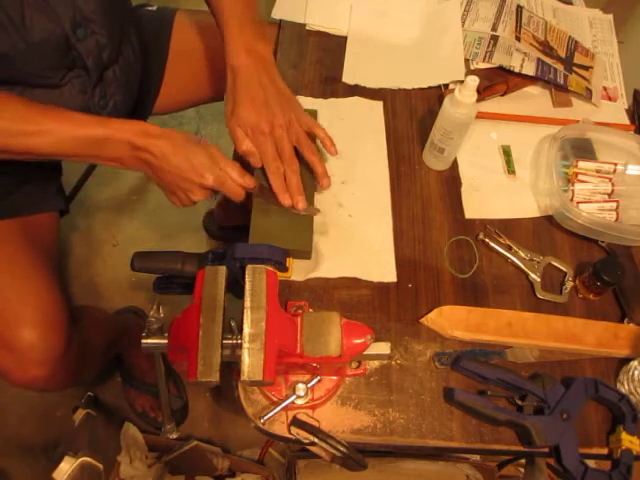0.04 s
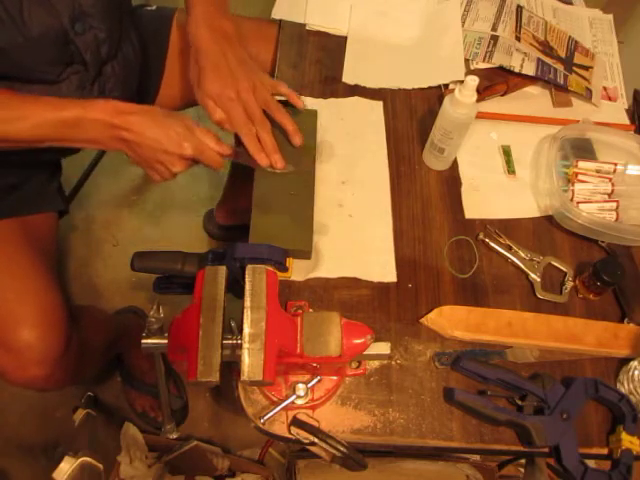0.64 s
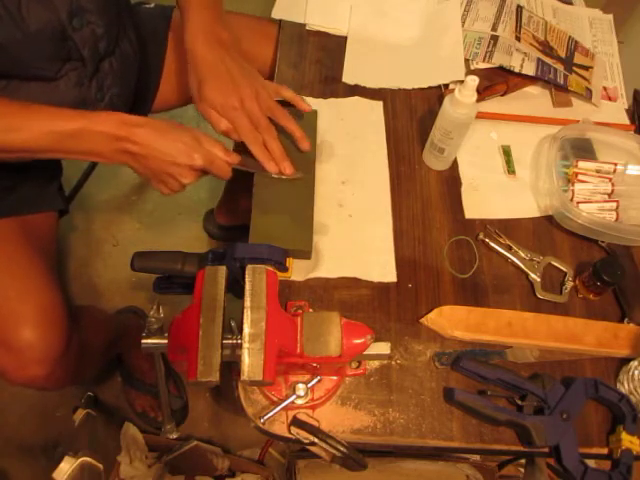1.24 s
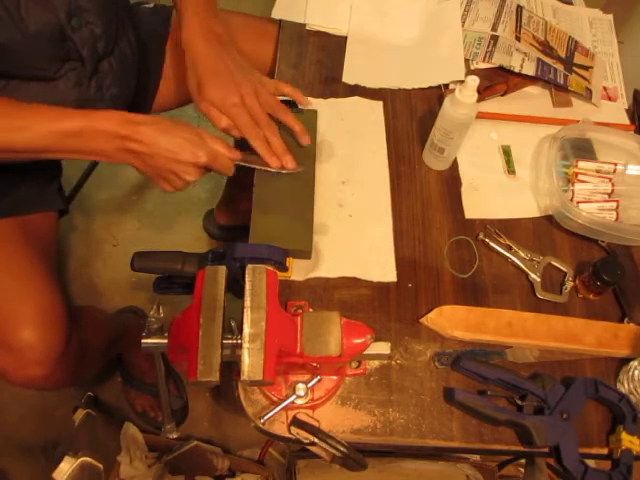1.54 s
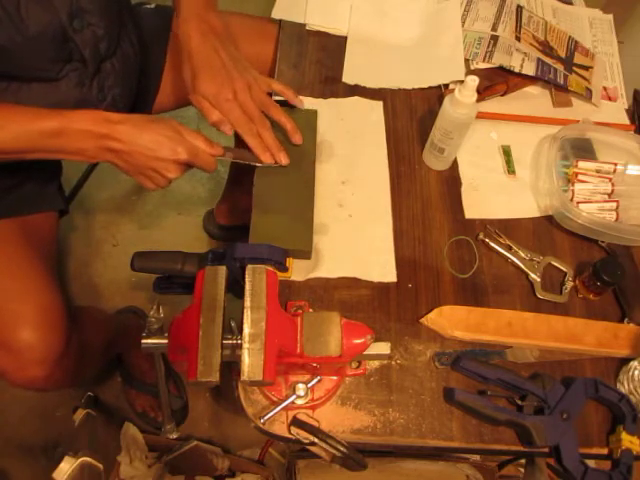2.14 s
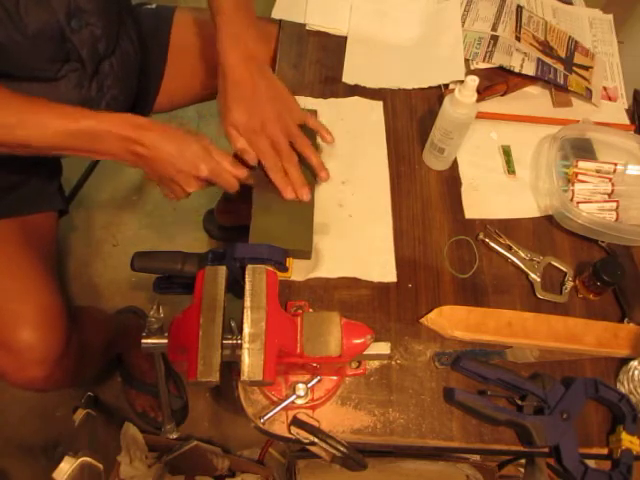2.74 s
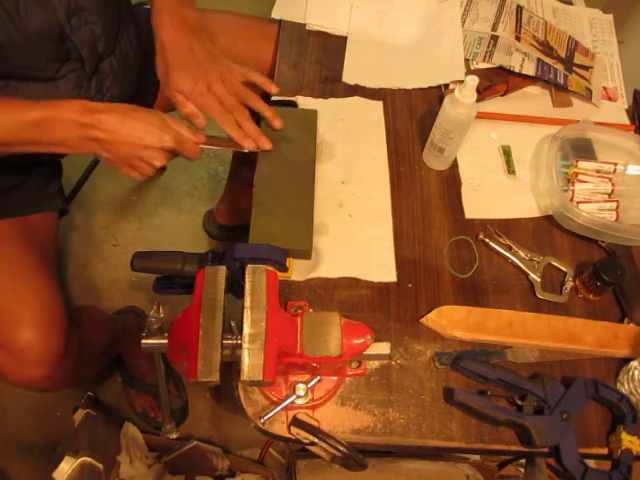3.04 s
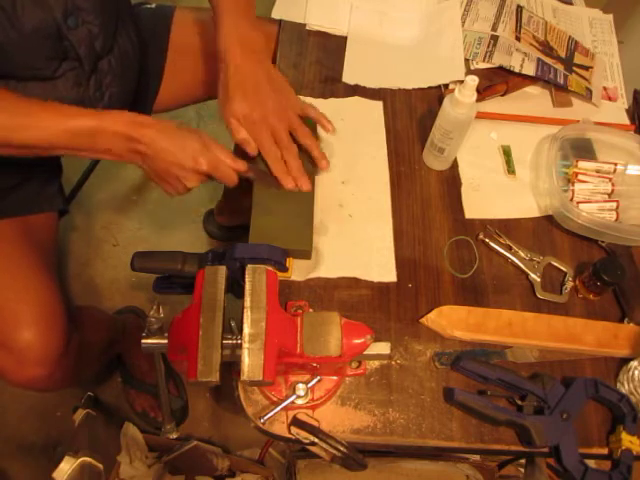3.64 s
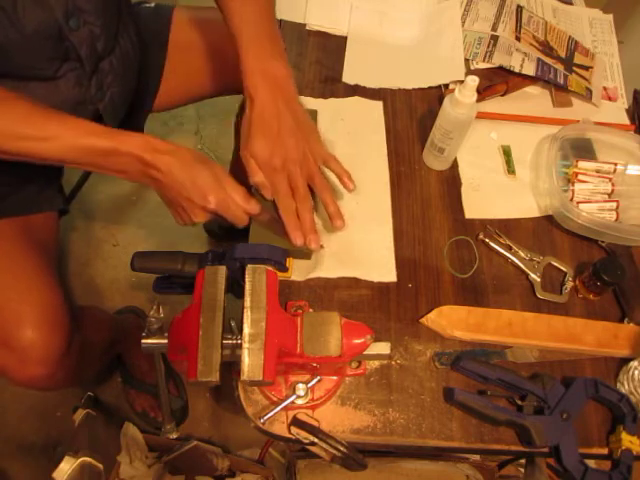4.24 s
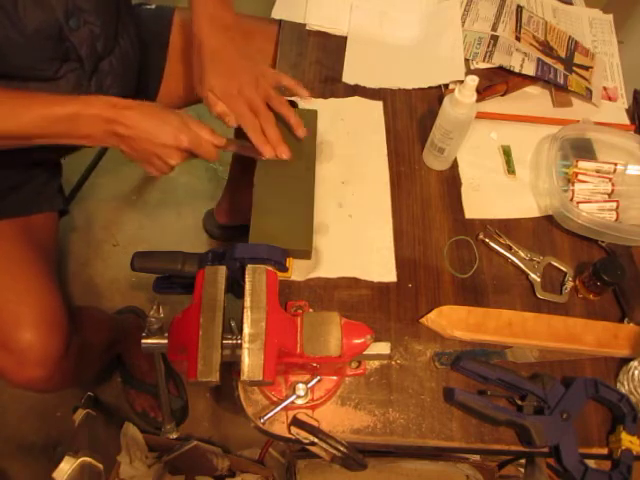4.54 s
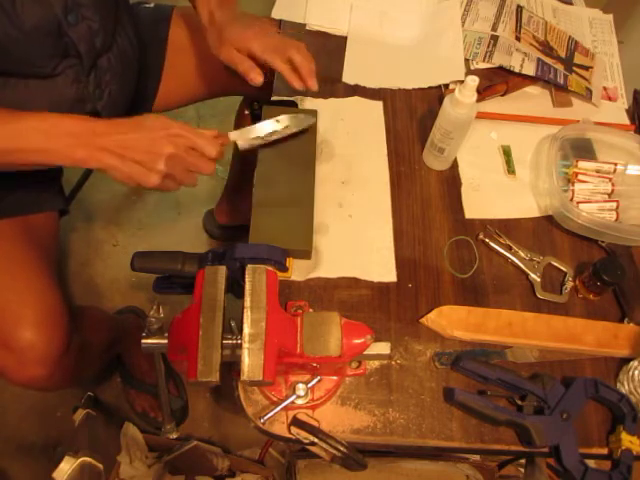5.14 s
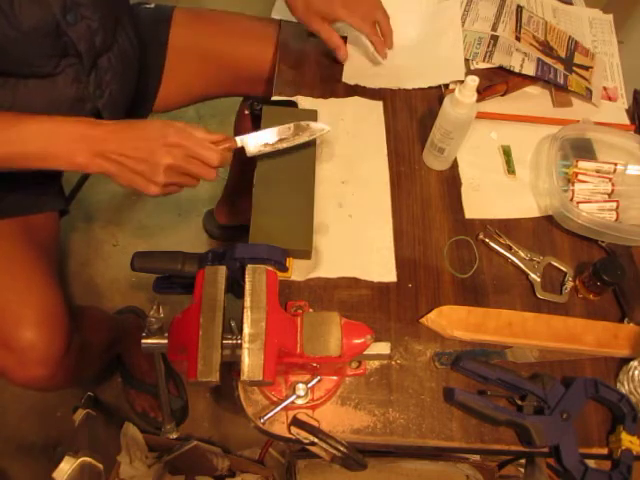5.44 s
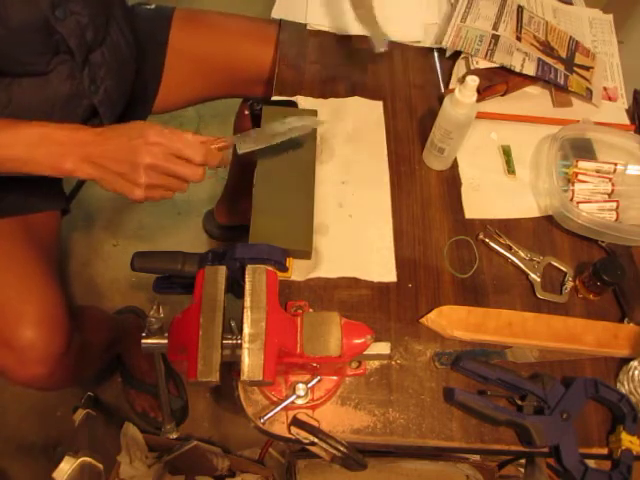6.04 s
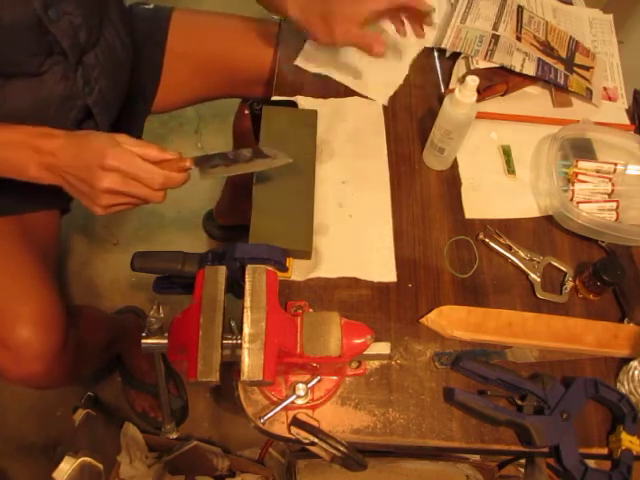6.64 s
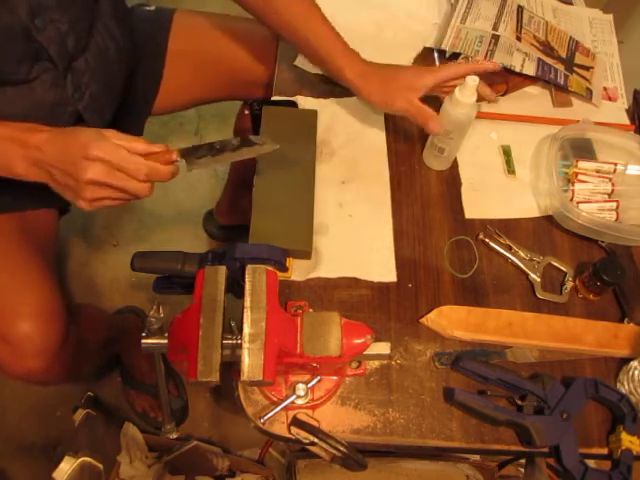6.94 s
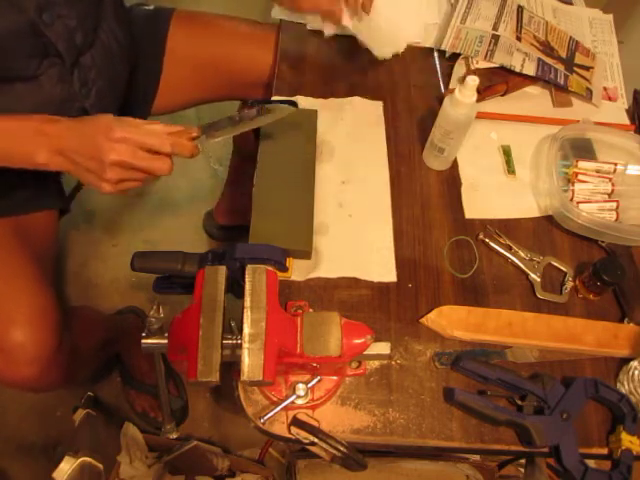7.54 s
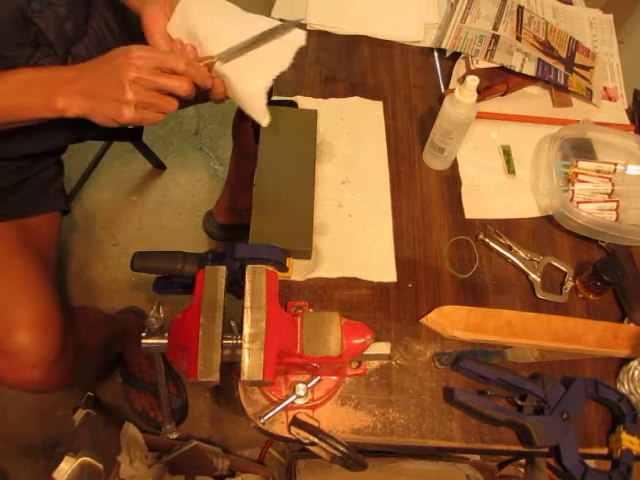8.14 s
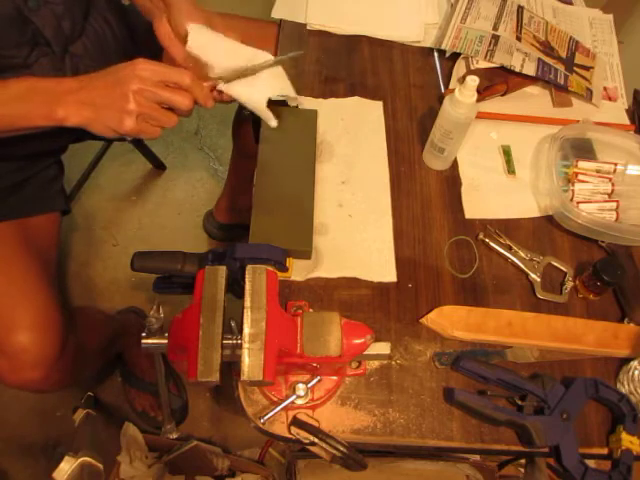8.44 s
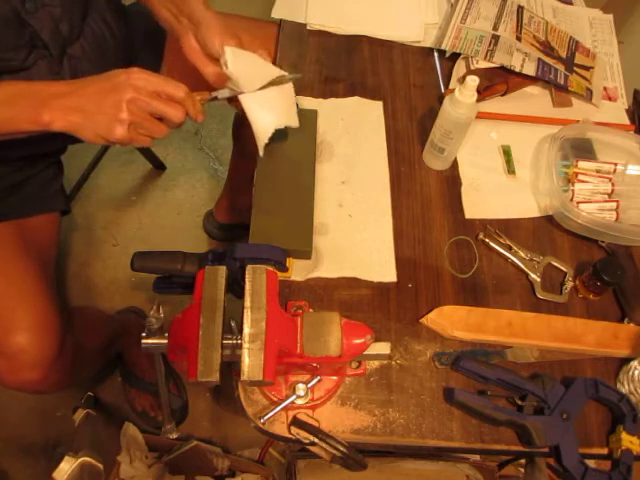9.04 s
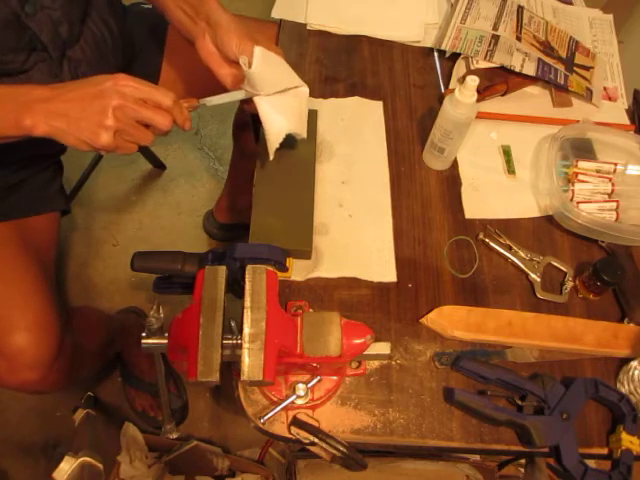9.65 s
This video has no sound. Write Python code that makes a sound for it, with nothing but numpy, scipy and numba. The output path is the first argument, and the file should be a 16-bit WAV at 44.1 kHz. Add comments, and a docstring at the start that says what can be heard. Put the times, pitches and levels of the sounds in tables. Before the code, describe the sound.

A knife blade scrapes back and forth on a sharpening block, then a cloth rustles and wipes it, with light workbench bumps.

```python
"""A knife is honed on an abrasive block clamped to a workbench: full strokes, quick short ones toward
the tip, then three long pairs. Grit plucks the steel edge and rings the blade, whose colour glides
as the contact travels along it. From about 5 s a hand picks up a cloth, bumps the bench and wipes
the blade in soft, rustling swells. Under it all a fan whirs in the small workshop."""
import sys
import numpy as np
from scipy import signal
from scipy.fft import rfft, irfft, next_fast_len
from scipy.io import wavfile
from scipy.ndimage import uniform_filter1d, map_coordinates
from numba import njit

SR = 44100
rng = np.random.default_rng(int(sys.argv[2]) if len(sys.argv) > 2 else 0)


def generate_wav(sig):
    """Save sig (samples, or channels by samples) to the path in sys.argv[1] as 16-bit PCM at SR."""
    pcm = np.round(np.clip(np.atleast_2d(sig).T, -1, 1) * 32767).astype(np.int16)
    wavfile.write(sys.argv[1], SR, pcm)


N = 436149
T = np.arange(N) / SR
FREQ = np.maximum(np.arange(N // 2 + 1) * SR / N, 1)
LEFT_RIGHT = np.array([[1], [-1]])

# Strokes on the block; the contact runs from 0 at the heel to 1 at the tip:
# (start [s], end [s], fastest at [share of stroke], swell [exponent], contact from [0-1],
#  contact to [0-1], hiss level [dB], and relative to the hiss: flat ring [dB], top [dB], grind [dB])
HONING_STROKES = [ (-.07, .255, 0.39, 0.74, 0.49, 0.51, -34.5, 1.5, -6, -20),
                  (0.256, 0.485, 0.55, 0.85, 0.092, 0.00025, -30.5, -8.5, -1.5, -22.5),
                  (0.474, 0.716, 0.44, 0.84, 0.31, 0.69, -32.5, -1, -4, -22),
                  (0.717, 0.89, 0.35, 1.07, .8, 0.75, -29.5, -8, -6, -27.5),
                  (0.882, 1.085, 0.32, 1.17, 0.67, 0.72, -32, -8, -5, -28),
                  (1.078, 1.232, 0.72, 0.55, 0.61, 0.55, -40, -12, -11, -24),
                  (1.233, 1.403, 0.52, 0.87, .8, 0.87, -32.5, -6, -5, -26.5),
                  (1.401, 1.56, 0.41, .8, 0.49, .55, -40.5, -16, -9, -26),
                  (1.55, 1.731, 0.45, 0.93, 0.51, 0.55, -41.5, -13.5, -8, -25),
                  (1.727, 1.926, 0.28, 1.2, 0.88, 0.9, -44, -4, -8, -19),
                  (2.12, 2.616, .62, 0.94, 0.82, 0.21, -30, -0.5, -5, -27.5),
                  (2.615, 3.068, .3, 0.9, 0.14, 0.97, -35, 0.5, -8, -28),
                  (3.072, 3.526, 0.65, 1.44, 0.91, 0.0056, -30.5, -2.5, -0.5, -26.5),
                  (3.521, 3.9, 0.26, 0.8, 0.13, 0.87, -34.5, 1, -2.5, -30),
                  (3.902, 4.311, 0.63, 1.57, 0.86, 0.25, -28, -4.5, 1.5, -27.5),
                  (4.306, 4.709, 0.27, 1.22, 0.094, 0.76, -33, -4.5, -3, -29.5), ]
# The edge bites deeper: (time [s], half length [s], extra hiss [dB], flat ring [dB], grind [dB])
EDGE_BITES = [(0.177, .025, 4, -4, -1.5), (0.32, 0.023, 5, -9, -5), (1.16, 0.012, 4, -4, -2),
              (2.37, 0.032, -0.5, -1.5, 8.5), (2.558, 0.016, 2.5, 2, -4), (2.719, .015, -0.5, 5, -8),
              (3.342, 0.035, 4, 0, -5), (3.738, .03, 3, -9, 4), (4.17, 0.016, 4, 1, -4),
              (4.42, 0.029, 2.5, 5.5, -3)]
# Broad colour of the scraping edge: (frequency [Hz], gain [dB])
EDGE_COLOUR = [(1500, -36.5), (2150, -11.5), (2900, -37), (4200, -12), (5000, -34.5), (6150, -10.5),
               (7000, -14.5), (8700, -9), (9900, -12.5), (10700, -5.5), (12000, -2), (13400, 1.5),
               (15800, 0)]
# Colour of the edge's stereo width: (frequency [Hz], gain [dB])
EDGE_SIDE_COLOUR = [(3000, -47), (5000, -39), (8500, -8.5), (12000, -6.5), (15800, -9.0)]
# Narrow rings of the edge: (frequency [Hz], width [Hz], gain [dB])
EDGE_RINGS = [(6560, 200, -16.5), (7700, 290, -8.5), (9590, 180, -5), (10490, 700, -4.5), (11950, 460, 1.5),
              (14900, 750, 1.5)]
# Rings of the flat of the blade: (frequency [Hz], width [Hz], gain [dB])
FLAT_RINGS = [(3690, 400, -13), (4700, 320, -4.5), (5067, 160, 1.5), (5500, 290, 2.5), (6950, 430, -2.5)]
# Grind beneath the hiss: (frequency [Hz], width [Hz], gain [dB])
GRIND_BANDS = [(2710, 460, 0.11), (3196, 330, 0.43)]
# Upper bending modes, damped to a rasp by the fingers: (ratio to first mode, gain [dB], Q)
BEND_OVERTONES = [(2.756, -1.5, 9.9), (3.4, -4.5, 9.0)]
# Short bright ticks on the blade: grains caught during strokes, and one faint finger touch in the pause:
# (time [s], peak level [dB])
BLADE_TICKS = [(.2745, -34), (.809, -30), (.922, -32), (1.153, -31), (1.7705, -29), (2.005, -44),
               (2.1462, -26.5), (2.724, -18), (3.748, -29), (4.187, -19)]
# Pull strokes make the block hum: (centre time [s], length [s], level [dB])
PULL_STROKES = [(0.11, 0.32, -53), (0.62, 0.29, -54), (1.01, 0.3, -60), (1.344, 0.12, -62),
                (2.83, 0.37, -61), (3.708, 0.57, -59.5), (4.496, 0.44, -59)]
# Short strokes rock the block on the bench: (time [s], level [dB])
ROCKING_LEVELS = [(0, -72), (.8, -70), (1.2, -66), (1.55, -58), (1.9, -66), (2.1, -77)]
# Rumble of the rocking block: (frequency [Hz], width [Hz], gain [dB])
ROCKING_BANDS = [(147, 52, -4.0), (520, 54, -7.5)]
# The cloth is pulled, shaken out and wiped along the blade:
# (peak time [s], rise [s], fall [s], fibre hiss [dB], fold rustle [dB])
CLOTH_WIPES = [ (5.055, .023, 0.05, -73, -81), (5.62, .027, 0.04, -55, -61), (5.7, 0.13, 0.14, -66.5, -62),
               (6.025, 0.083, .017, -63.5, -69), (6.11, .07, .03, -72, -76),
               (6.317, 0.087, 0.037, -57.5, -55), (6.428, .012, 0.028, -53, -55),
               (6.46, .02, 0.021, -64, -52), (6.505, .06, 0.032, -61.5, -56), (6.9, 0.14, .055, -77, -62.5),
               (7.469, .07, 0.032, -62.5, -62), (7.642, .018, .035, -56, -57),
               (7.78, 0.091, 0.11, -55, -56), (8.088, 0.081, .045, -62.5, -56.5),
               (8.3, .19, .02, -61.5, -59), (8.412, 0.073, 0.089, -59, -54), (8.55, .06, 0.079, -64, -56.5),
               (8.83, 0.25, .22, -72.5, -71), (9.016, .01, 0.036, -64.5, -57.5), ]
# Airy hiss of the fibres: (frequency [Hz], gain [dB])
FIBRE_EQ = [(1500, -8), (2700, 3.5), (3600, -8.5), (5000, -5.5), (8000, -2.5), (11000, 4.5), (13000, 1),
            (15800, -1)]
# Darker rustle of the folds: (frequency [Hz], gain [dB])
FOLD_EQ = [(60, -10), (150, 0), (280, -1), (500, 8.5), (900, 10), (1500, -0.5), (2100, -1.5), (2650, 3),
           (3300, -5.5), (6000, -12.5), (15800, -35)]
# The cloth snaps in a fold: (time [s], relative peak level [dB])
FOLD_SNAPS = [(5.337, -37.5), (5.6109, -47), (5.6907, -36), (5.792, -47), (6.023, -44), (6.2405, -41),
              (6.4205, -42), (6.5093, -50), (7.6358, -48), (8.2539, -49), (9.0087, -47)]
# Hand or blade bumps the bench: (time [s], peak level [dB], contact time [s])
BENCH_BUMPS = [(1.385, -44, .003), (1.513, -39, 0.00049), (1.573, -41, 0.0026), (1.776, -36, 0.00035),
               (5.545, -42, 0.0023), (5.569, -31, 0.0015), (5.584, -41, 0.0044), (5.63, -39, 0.0026),
               (7.4, -37, 0.0027), (7.412, -42, 0.0028), (7.447, -42, 0.0043), (7.622, -38, 0.0003),
               (7.63, -35, 0.0011), (7.675, -39, 0.0011), (8.435, -38, .0008)]
# Modes of the wooden top: (frequency [Hz], t60 [s], gain [dB])
BENCH_RINGS = [(62, 0.15, -28), (155, 0.039, -13), (210, 0.043, 2), (298, 0.032, 8), (474, 0.022, 9.5),
               (733, 0.12, 2), (1048, 0.066, 8.5), (1480, 0.041, 3)]
# Resonances of the fan's housing: (frequency [Hz], width [Hz], gain [dB])
FAN_HOUSING = [(1248, 89, 3), (1433, 27.6, 1), (1563, 107, 1), (1706, 210, -23)]
# Room tone that both ears share: (frequency [Hz], noise density [dB re 1/Hz])
ROOM_TONE_MID = [(25, -79.5), (150, -80.5), (260, -82.5), (420, -86.5), (800, -91), (1600, -89.5),
                 (2100, -102), (3000, -110), (4200, -115), (7500, -116), (11500, -114), (15800, -116)]
# Room tone in opposite phase between the ears: (frequency [Hz], noise density [dB re 1/Hz])
ROOM_TONE_SIDE = [(25, -62), (60, -69.5), (150, -66), (260, -71.5), (420, -75.5), (700, -82), (1100, -86.5),
                  (1650, -90), (2100, -101), (3000, -111), (4200, -118), (7500, -120), (11500, -116),
                  (15800, -117)]

HEEL_HZ, TIP_HZ, BEND_LAW = 5436, 2897, 1.85  # the first bending mode falls toward the tip
TIP_LOSS_DB, TIP_LAW = -13.5, 4.9  # the hiss fades as the tip alone touches
FLAT_FADE_DB = -16.5  # change in the ring of the flat from heel to tip
HELD_DB, FREE_DB, FREE_AT, FREE_WIDTH = -14, 8.5, 0.71, .15  # bending rings best near the belly
TOP_SLOPE, GRIND_SLOPE = .25, -0.43  # dB per dB of stroke motion, relative to the hiss
COMB_ECHO, COMB_CYCLES = 0.21, 2.11  # inverted echo from the fingers; lag in bending cycles
STICTION = 0.17  # share of full speed below which the blade clings to the block
TURN_DB = -23.5  # the edge keeps scraping a little as the stroke turns round


def honing():
    """Grit rings the edge and flat of the blade while the bending modes glide; returns mid and side."""
    place, motion_db, (hiss_db, flat_db, top_db, grind_db) = stroke_motion()
    hiss_bite, flat_bite, grind_bite = bites()
    hiss_db = hiss_db + motion_db + hiss_bite + TIP_LOSS_DB * place ** TIP_LAW
    flat_db = flat_db + flat_bite + FLAT_FADE_DB * place
    top_db = top_db + TOP_SLOPE * motion_db
    grind_db = grind_db + grind_bite + GRIND_SLOPE * motion_db
    freedom = undb(HELD_DB + FREE_DB * np.exp(-((place - FREE_AT) / FREE_WIDTH) ** 2))
    bend_hz = (HEEL_HZ + (TIP_HZ - HEEL_HZ) * place ** BEND_LAW) * (1 + .012 * wander(25))
    hiss, side = edge_hiss(bend_hz, top_db)
    plucks = grit(bend_hz)
    flat = unit(eq(plucks, peaks(FLAT_RINGS))) + undb(4.5) * freedom * bending_ring(bend_hz, q=12.0)
    grind = unit(eq(plucks, peaks(GRIND_BANDS)))
    rasp = sum(undb(db) * bending_ring(np.minimum(ratio * bend_hz, SR * 4 / 9), q)
               for ratio, db, q in BEND_OVERTONES)
    mid = undb(1.6) * hiss + undb(flat_db - 2.8) * flat + undb(grind_db) * grind + freedom * rasp
    mid = eq(mid, 1 - peaks([(2060, 360, -5)]))  # the blade radiates poorly below its lowest rings
    roughness = undb(0.64 * wander(450) + 0.83 * wander(60))
    return np.array([mid, side]) * undb(hiss_db) * roughness


def stroke_motion():
    """The hand speeds up and slows to each turn; returns contact place, motion in dB and four levels."""
    place, motion, levels = np.zeros(N), np.full(N, undb(-90)), np.zeros((4, N))
    for start, end, fastest, swell, here, there, *stroke_db in HONING_STROKES:
        now = (T >= start) & (T < end)
        peak_s = start + fastest * (end - start)
        speed = np.sin(np.pi * np.interp(T[now], [start, peak_s, end], [0, .5, 1]))
        speed = speed ** 2 * (1 + STICTION) / (speed + STICTION)
        place[T >= start] = there
        place[now] = here + (there - here) * np.cumsum(speed) / speed.sum()
        motion[now] = speed ** swell + undb(TURN_DB)
        levels[:, T >= start] = np.array(stroke_db)[:, None]
    place = np.clip(smooth(place, SR // 25), 0, 1)
    return place, smooth(20 * np.log10(motion), SR // 55), smooth(levels, SR // 30)


def bites():
    """Accents of hiss, ring and grind, in dB, as the edge digs in for a moment."""
    return sum(np.array(extra_db)[:, None] * np.exp(-((T - s) / half_length) ** 2)
               for s, half_length, *extra_db in EDGE_BITES)


def grit(bend_hz):
    """Dense grains pluck the steel; waves return from the blade's ends as a gliding metallic ripple."""
    plucks = grains(rate=30000, spread_db=0.6)
    plucks = plucks + .25 * tail(plucks, t60=.08)
    lag_cycles = np.geomspace(5, 48, 6) * rng.uniform(.85, 1.15, 6)
    echoes = sum(np.interp(T - cycles / bend_hz, T, plucks) for cycles in lag_cycles)
    return unit(plucks + .27 * echoes)


def edge_hiss(bend_hz, top_db):
    """The plucked edge sizzles, hollowed by a moving notch and comb; returns mid and side."""
    plucks = np.array([grit(bend_hz) for _ in range(2)])
    hiss = unit(eq(plucks, np.hypot(colour(EDGE_COLOUR), peaks(EDGE_RINGS))))
    top = eq(hiss, np.clip((FREQ - 12000) / 3000, 0, 1))
    mid, side = hiss + (undb(top_db) - 1) * top
    hollow = mid - bandpass(mid, 0.95 * bend_hz, q=17.0)  # antiresonance just under the first mode
    echo = map_coordinates(hollow, [(T - COMB_CYCLES / bend_hz) * SR])
    return (hollow - COMB_ECHO * echo) / np.hypot(1, COMB_ECHO), eq(side, colour(EDGE_SIDE_COLOUR))


def bending_ring(hz, q):
    """A gliding mode of the blade, kept ringing by friction."""
    return unit(bandpass(bandpass(noise(), hz, q), hz, q))


def ticks(events, decay_s, highpass_hz):
    """A brief contact on the blade or a snapping fold gives a short, bright burst of noise."""
    out, t = np.zeros(N), T[:SR // 30]
    highpass = signal.butter(2, highpass_hz, "high", fs=SR, output="sos")
    for s, db in events:
        burst = signal.sosfilt(highpass, rng.standard_normal(len(t)) * np.exp(-t / decay_s))
        add_hit(out, s, burst, db)
    return out


def block_hum(hz, width_hz):
    """The dragged edge shakes the clamped block, most in mid-stroke."""
    drag = sum(undb(db) * np.cos(np.pi * np.clip((T - s) / length, -.5, .5))
               for s, length, db in PULL_STROKES)
    return drag * unit(eq(noise(), peaks([(hz, width_hz, 0)])))


def block_rocking():
    """The block shifts in its clamp and the bench rumbles."""
    times, db = np.transpose(ROCKING_LEVELS)
    gate = np.clip(np.minimum(T - times[0], times[-1] - T) * 20 + 1, 0, 1)  # 50 ms fade
    return unit(eq(noise(), peaks(ROCKING_BANDS))) * undb(np.interp(T, times, db)) * gate


def cloth():
    """Each wipe swells and dies away: fibres slip in little bunches and the folds rustle lower down."""
    power = 0
    for s, rise, fall, fibre_db, fold_db in CLOTH_WIPES:
        from_peak = np.abs(T - s) / np.where(T < s, rise, fall)
        swell = np.exp(-from_peak ** 1.19)  # exponent 1 is pointed, 2 rounded
        power = power + (undb([[fibre_db], [fold_db]]) * swell) ** 2
    fibres = unit(eq(grains(rate=7000, spread_db=1.5), colour(FIBRE_EQ)))
    folds = unit(eq(grains(rate=3000, spread_db=1), colour(FOLD_EQ)))
    return (np.sqrt(power) * [fibres, folds]).sum(axis=0) * undb(0.91 * wander(90))


def bench_bumps():
    """A soft push rings the wooden top; a shorter push sounds brighter."""
    out, t = np.zeros(N), T[:SR // 4]
    ring = sum(undb(db) * np.sin(2 * np.pi * hz * t) * np.exp(-np.log(1000) * t / t60)
               for hz, t60, db in BENCH_RINGS)
    for s, db, contact_s in BENCH_BUMPS:
        push = np.sin(np.pi * np.minimum(t / contact_s, 1))
        add_hit(out, s, signal.fftconvolve(ring, push)[:len(t)], db)
    return out


def fan(whine_hz, left_lag_s):
    """Air whirs in the housing, louder on the left, under a thin wavering whine."""
    housing = peaks(FAN_HOUSING)
    air = unit(eq(noise(), housing))
    direct = np.array([np.interp(T - left_lag_s, T, air), air]) * undb([[-56], [-60.5]])
    diffuse = unit(eq(np.array([noise(), noise()]), housing)) * undb([[-63], [-67]])
    phase = 2 * np.pi * np.cumsum(whine_hz + 3.54 * wander(30)) / SR
    whine = np.sin(phase) * undb(-67 + 2.3 * wander(4.0)) * np.array([[1.8], [-.5]])
    return (direct + diffuse) * undb(0.396 * wander(12)) + whine


def room_tone():
    """A wide, low bed of workshop noise."""
    mid, side = (eq(noise(), colour(c)) * np.sqrt(SR / 2) for c in (ROOM_TONE_MID, ROOM_TONE_SIDE))
    return (mid + side * LEFT_RIGHT) * undb(0.43 * wander(8.6))


def undb(db):
    """Decibels to gain."""
    return 10 ** (np.asarray(db) / 20)


def unit(x):
    """Scale to rms 1."""
    return x / np.sqrt(np.mean(x ** 2))


def smooth(x, samples):
    """Ease a control curve with a moving average."""
    return uniform_filter1d(x, samples, mode="nearest")


def colour(points):
    """EQ curve through (frequency [Hz], gain [dB]) points."""
    hz, db = np.transpose(points)
    return undb(np.interp(np.log(FREQ), np.log(hz), db))


def peaks(modes):
    """EQ curve of resonances (frequency [Hz], width [Hz], gain [dB])."""
    return sum(undb(db) / (1 + ((FREQ - hz) / width) ** 2 * 2) for hz, width, db in modes)


def eq(x, gain):
    """Filter by a gain at each frequency."""
    size = next_fast_len(N + N // 20, real=True)
    bin_hz = np.arange(size // 2 + 1) * SR / size
    return irfft(rfft(x, size) * np.interp(bin_hz, FREQ, gain), size)[..., :N]


@njit
def bandpass(x, hz, q):
    """Swept state-variable band-pass; gain 1 at the centre."""
    y, band_state, low_state = np.empty(len(x)), 0., 0.
    for i in range(len(x)):
        g = np.tan(np.pi * hz[i] / SR)
        band = (band_state + g * (x[i] - low_state)) / (1 + g * (g + 1 / q))
        band_state = 2 * band - band_state
        low_state += 2 * g * band
        y[i] = band / q
    return y


def noise():
    """White noise."""
    return rng.standard_normal(N)


def wander(rate):
    """Random drift of rms 1, with about rate turns a second."""
    return unit(np.interp(T * rate, np.arange(N // 10), rng.standard_normal(N // 10)))


def grains(rate, spread_db):
    """Tiny random impacts, rate a second, a few larger than the rest."""
    impacts = (rng.random(N) < rate / SR) * noise()
    return unit(impacts * undb(spread_db * np.minimum(rng.exponential(size=N), 4)))


def tail(x, t60):
    """Diffuse decay of a sound, of the same power."""
    t = T[:SR // 2]
    response = rng.standard_normal(len(t)) * np.exp(-np.log(1000) * t / t60)
    return signal.fftconvolve(x, response / np.linalg.norm(response))[:N]


def add_hit(track, s, sound, peak_db):
    """Mix a one-shot in at time s, peaking at peak_db."""
    start = int(s * SR)
    track[start:start + len(sound)] += undb(peak_db) * sound[:N - start] / np.abs(sound).max()


def scene():
    """The work sits in the centre, widened by edge hiss and short tails, over room tone and fan."""
    blade, blade_side = honing()
    blade_ticks = ticks(BLADE_TICKS, decay_s=0.00057, highpass_hz=7950)
    snaps = undb(-14.5) * ticks(FOLD_SNAPS, decay_s=0.0022, highpass_hz=2200)
    wood = block_hum(hz=652, width_hz=110) + bench_bumps() + block_rocking()
    rustle = cloth()
    mid = blade + blade_ticks + snaps + rustle + wood
    side = blade_side + undb(-10) * tail(rustle, t60=0.033) + undb(-15) * tail(wood, t60=.06)
    return mid + side * LEFT_RIGHT + room_tone() + fan(whine_hz=1795, left_lag_s=.00015)


def record(dry):
    """A steep high cut at 15.72 kHz."""
    return eq(dry, np.clip((15720 - FREQ) / 200 + .5, 0, 1))


dry = scene()
out = record(dry)
generate_wav(out)
```